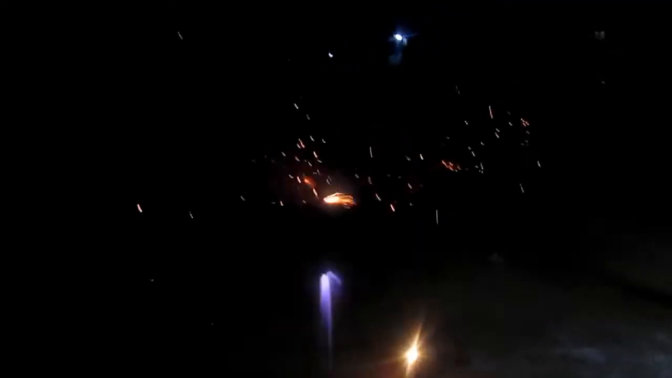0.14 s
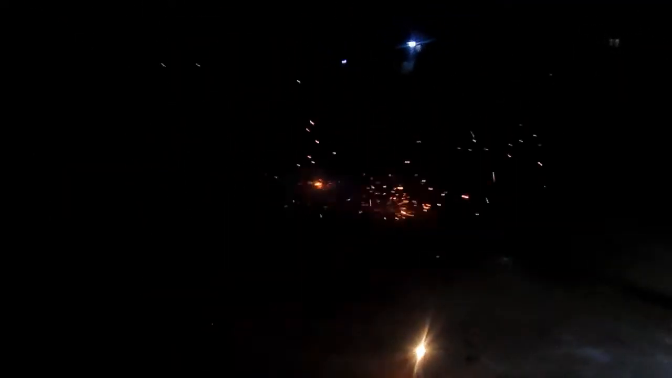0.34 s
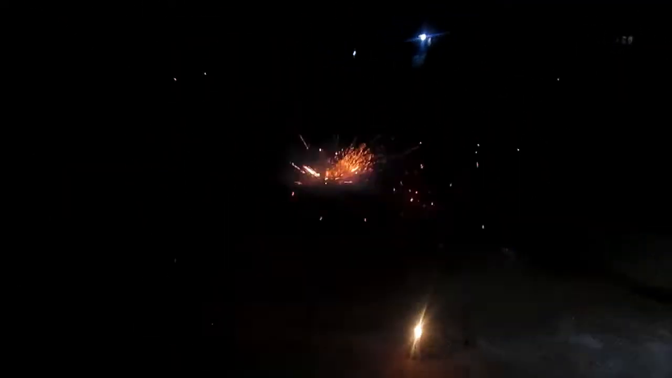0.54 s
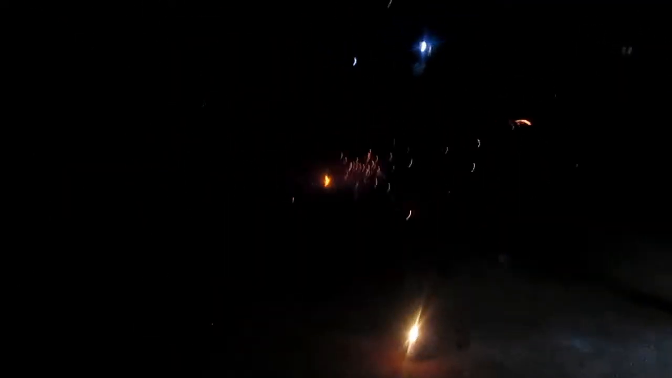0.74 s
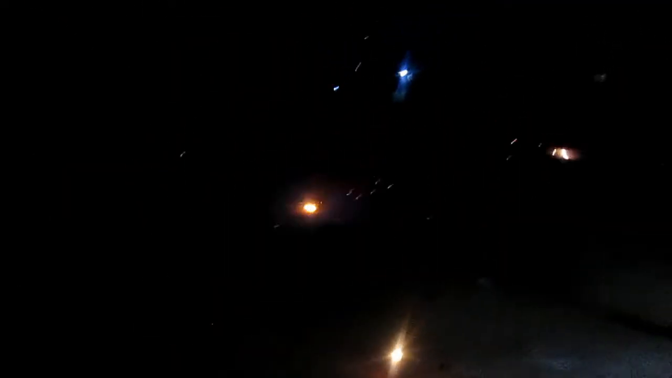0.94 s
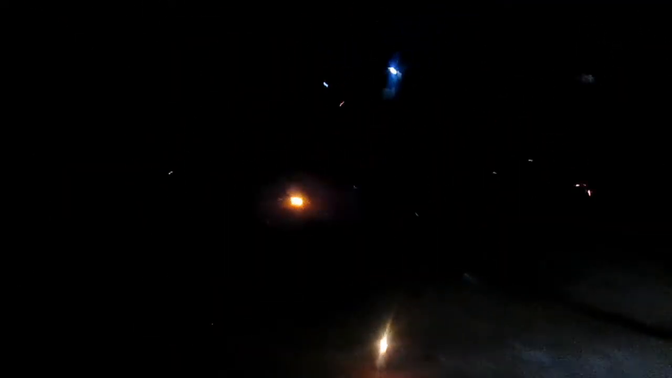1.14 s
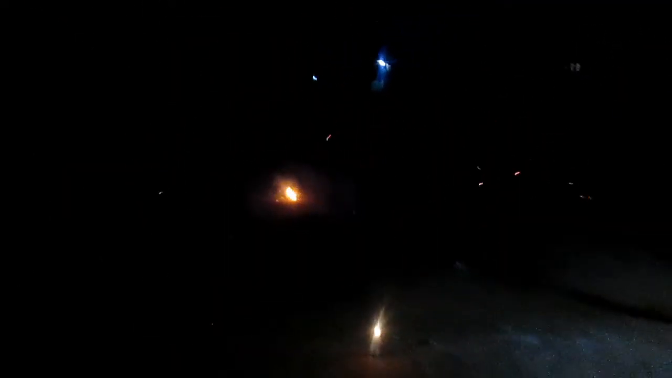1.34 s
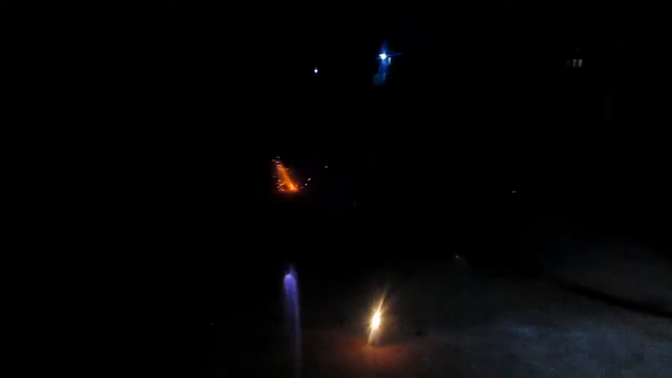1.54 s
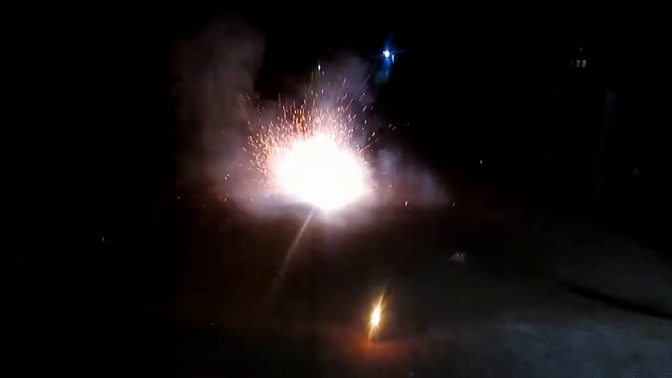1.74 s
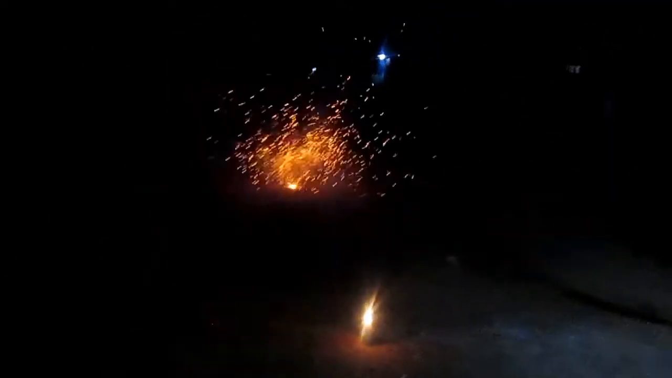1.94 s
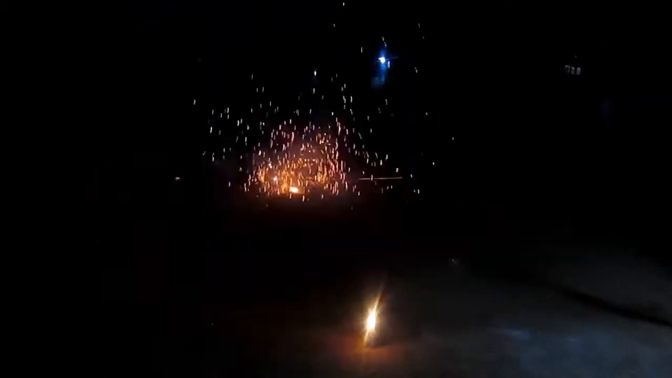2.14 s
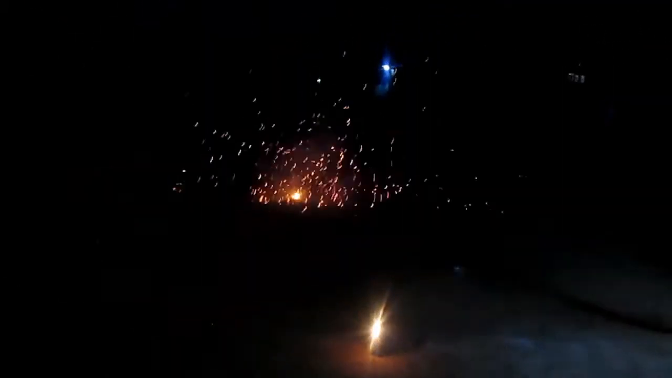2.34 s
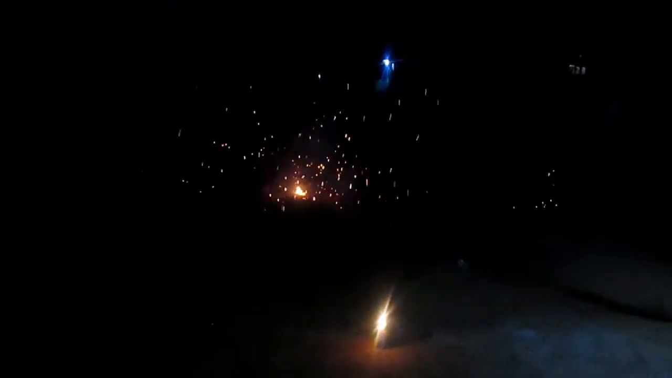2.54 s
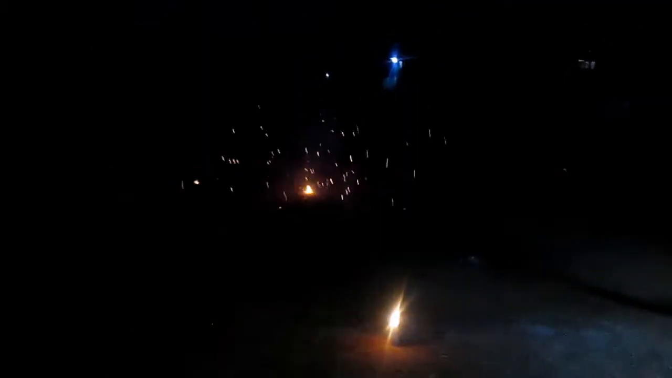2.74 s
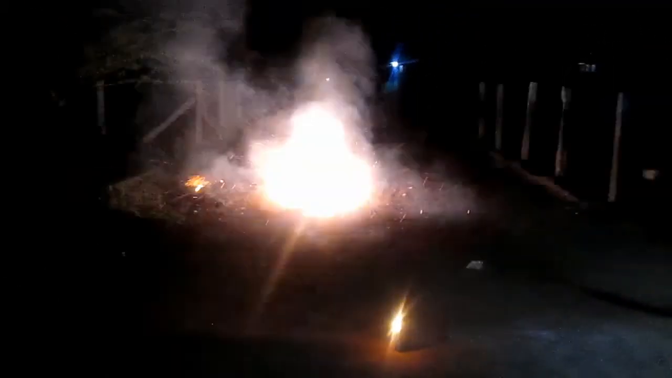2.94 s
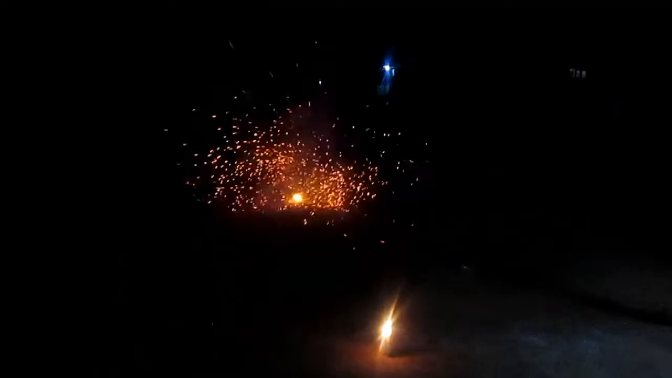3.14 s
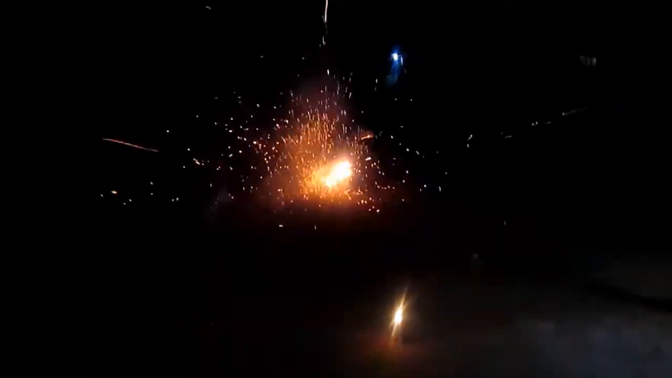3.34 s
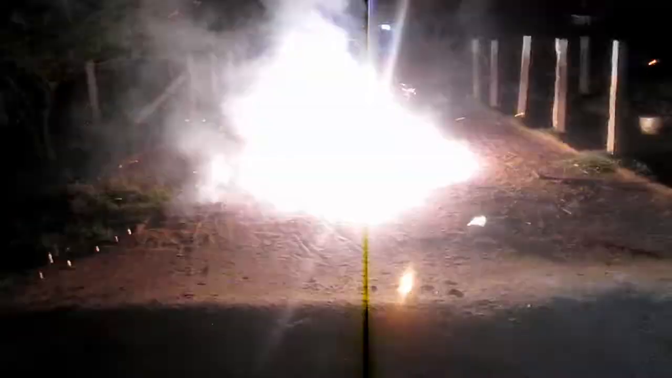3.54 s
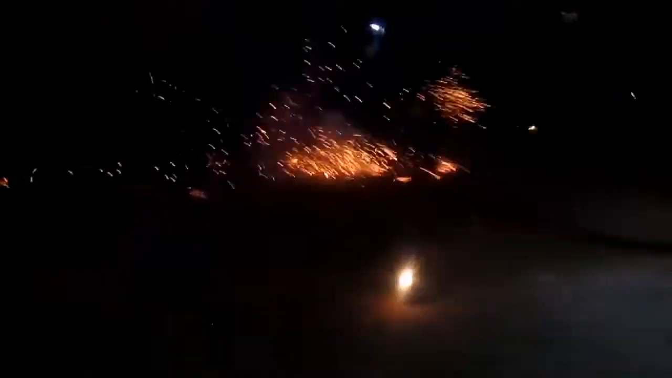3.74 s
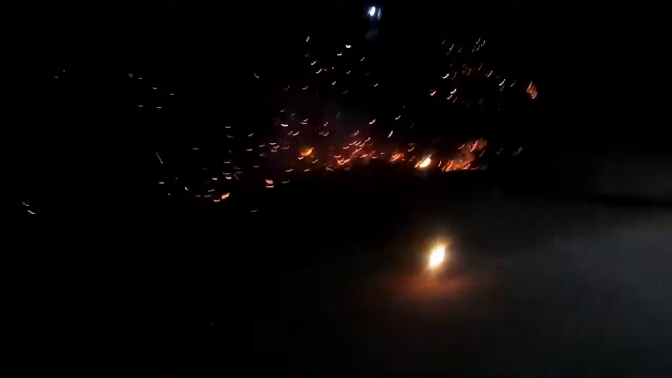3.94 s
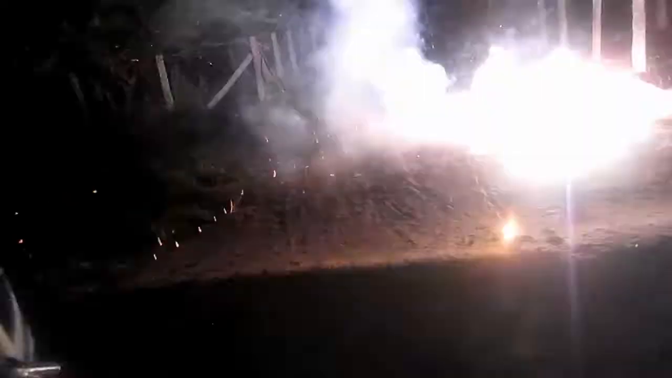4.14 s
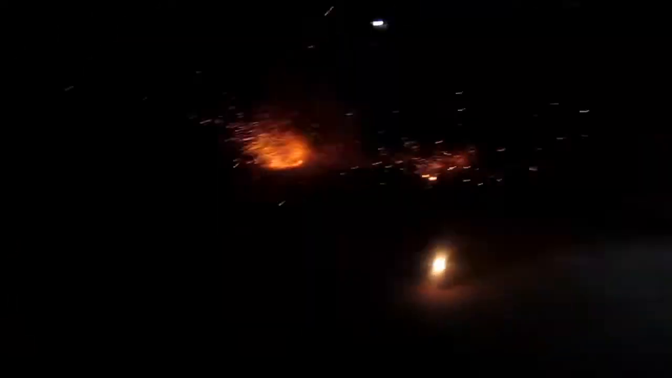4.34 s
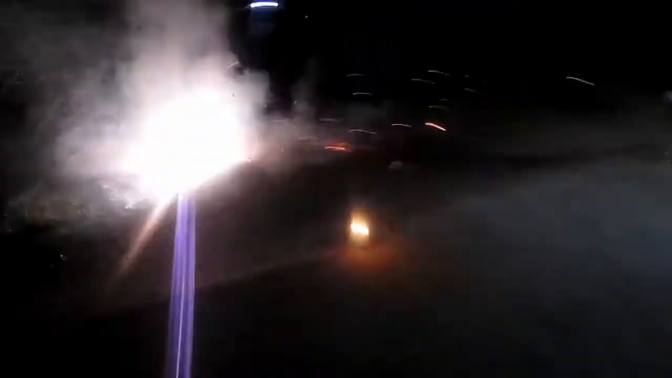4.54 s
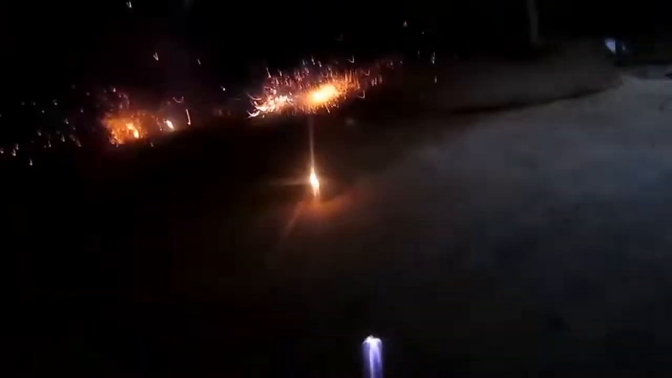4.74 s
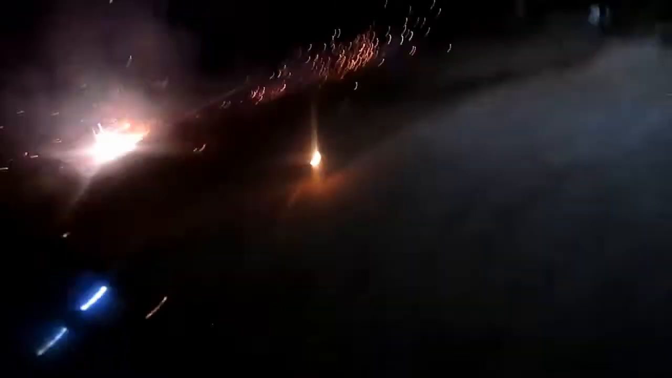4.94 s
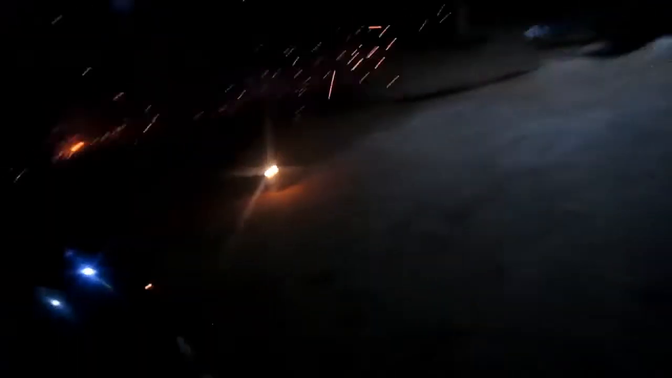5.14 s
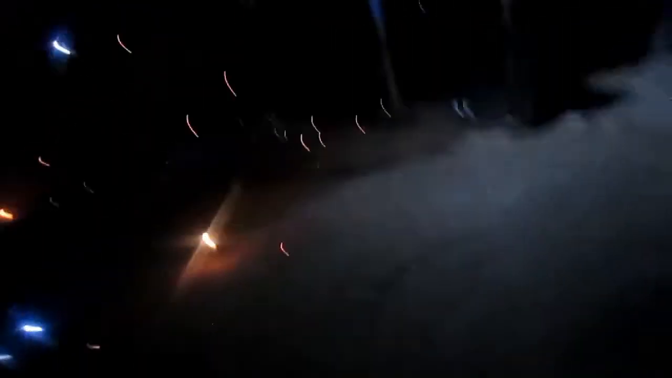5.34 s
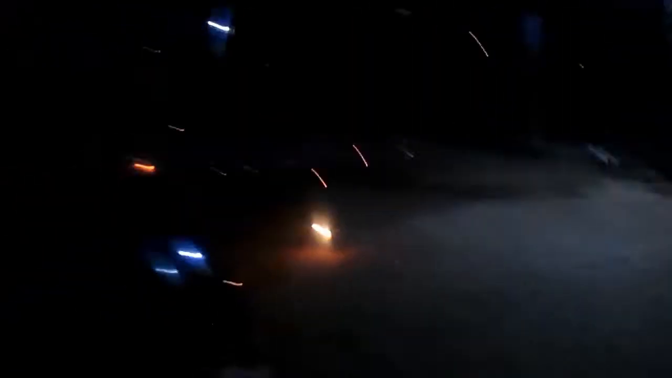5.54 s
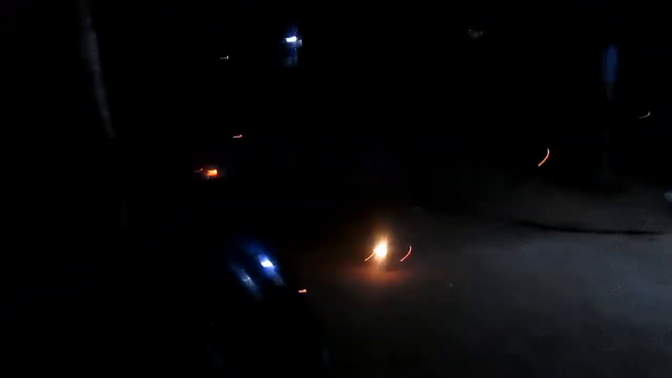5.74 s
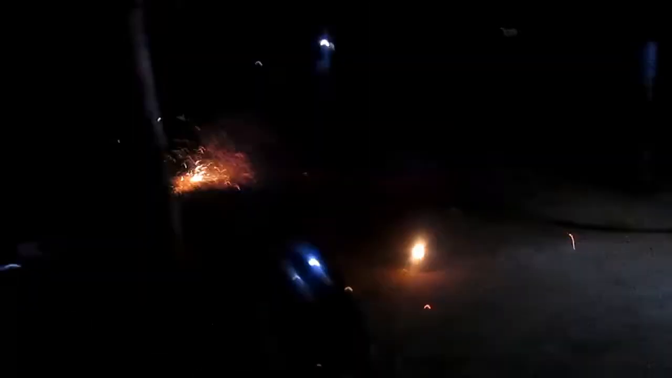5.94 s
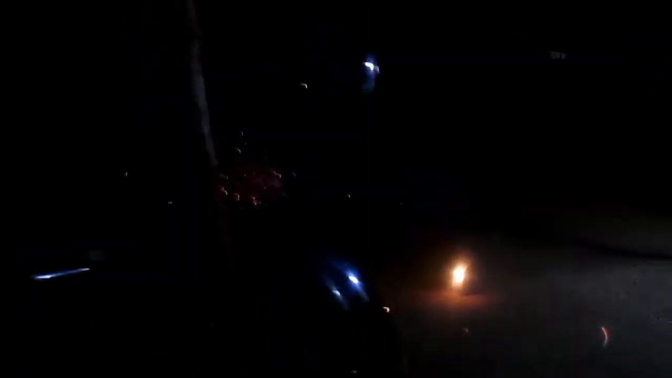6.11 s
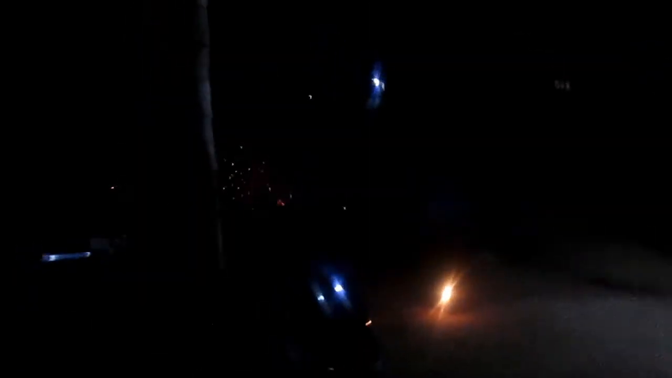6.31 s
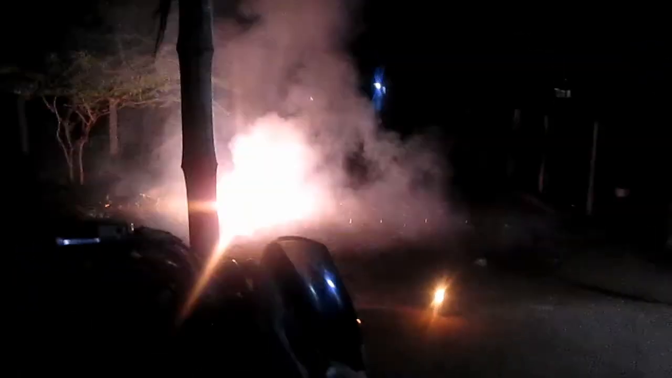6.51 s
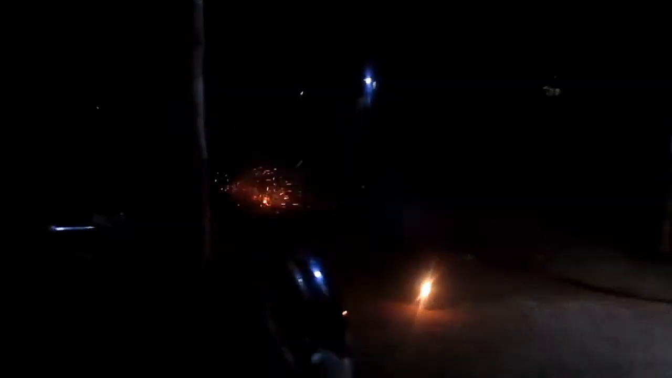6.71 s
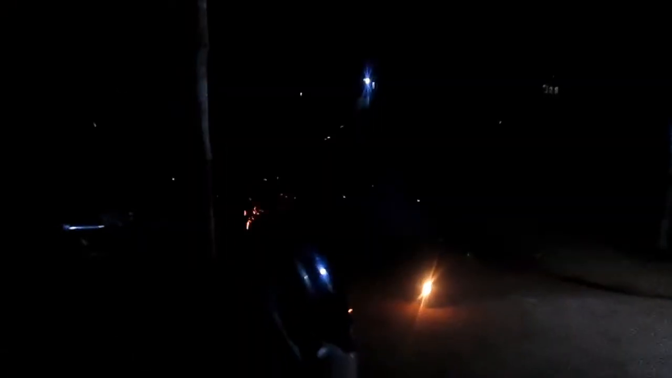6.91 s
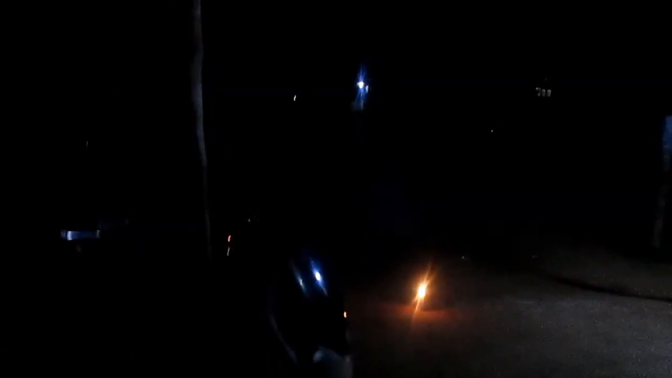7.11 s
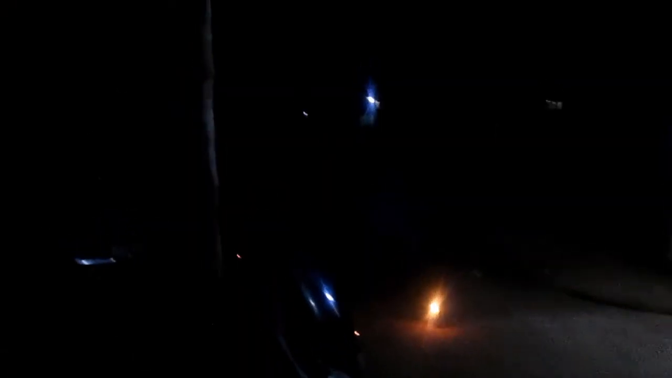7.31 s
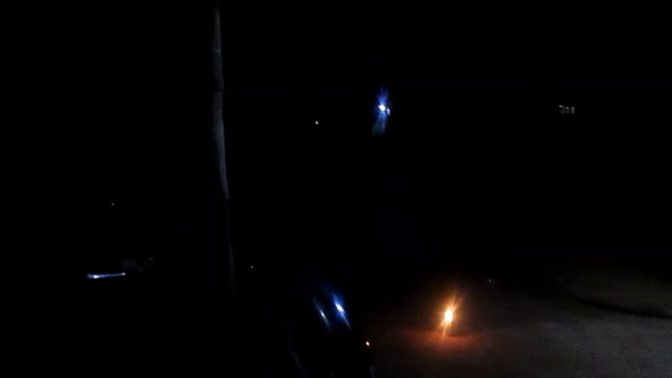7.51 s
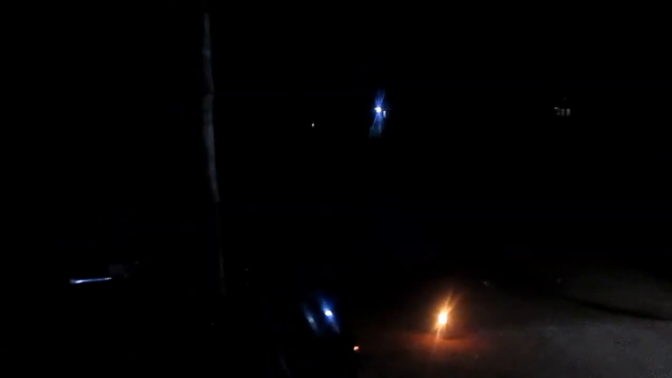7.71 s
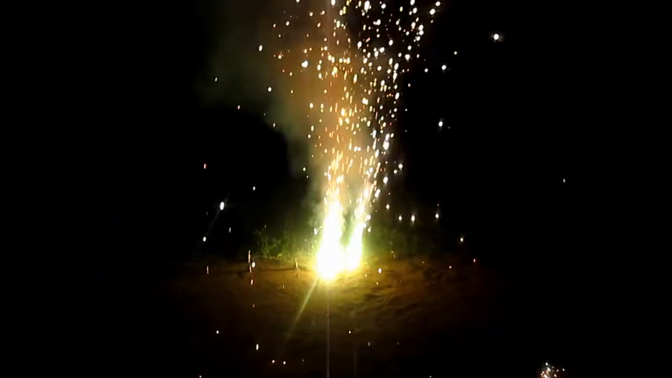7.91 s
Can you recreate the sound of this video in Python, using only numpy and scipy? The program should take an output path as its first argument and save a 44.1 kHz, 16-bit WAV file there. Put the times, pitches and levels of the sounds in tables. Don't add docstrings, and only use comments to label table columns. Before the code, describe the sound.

A string of firecrackers bangs in irregular overloaded clusters outdoors at night, with hissing sparks, snapping grit and distant crackers rolling in between.

```python
import sys
import numpy as np
from scipy import signal
from scipy.io import wavfile

SR = 44100
rng = np.random.default_rng(int(sys.argv[2]) if len(sys.argv) > 2 else 0)


def linear_from_db(decibels):
    return 10 ** (np.asarray(decibels, float) / 20)


def unload_audio(sound):
    columns = np.transpose(np.atleast_2d(sound))
    steps = np.round(np.clip(columns, -1, 1) * 32767)
    wavfile.write(sys.argv[1], SR, steps.astype(np.int16))


N = 351469

# start_s, peak_db, echo_hold_s, crack_over_thump_db
BANG_EVENTS = [(0.199, -13, 0.0047, 5), (0.519, -17.5, 0.0062, 10), (1.603, -13, 0.0017, 6),
               (1.697, -10.5, 0.028, 8), (1.977, -18.5, 0.0082, 14), (2.074, -17.5, 0.025, 7.5),
               (2.855, -12, 0.0077, 2.3), (2.997, -24.5, 0.00079, 1), (3.178, -13, .02, 6),
               (3.224, -16.5, 0.014, 4.5), (3.578, -18, 0.018, 2.5), (3.646, -17, .043, 8.5),
               (4.046, -21, 0.039, 3.5), (4.156, -13.5, 0.047, 7.5), (4.272, -8, .006, 1.5),
               (4.315, -14, 0.031, 10.5), (4.595, -21, 0.016, 4.5), (4.649, -21.5, 0.01, 4),
               (4.733, -13, 0.0045, -4.5), (4.815, -13, 0.0063, 0), (4.877, -11, 0.0058, 0.3),
               (4.955, -14.5, 0.011, -9), (5.773, -13, 0.012, 5.5), (5.899, -17, .011, 2),
               (6.555, -11.5, 0.019, 5), (6.66, -14.5, 0.011, 8.5)]


def rms_one(x):
    return x / np.sqrt(np.mean(x ** 2) + 1e-20)


def in_time(rows):
    s, *columns = np.transpose(rows)
    return [np.interp(np.arange(N) / SR, s, column) for column in columns]


def passed(x, hz, kind, order=2):
    return signal.sosfilt(signal.butter(order, hz, kind, fs=SR, output="sos"), x)


def drift(rate):
    points = np.tanh(rng.standard_normal(1600) / 1.5)
    return rms_one(np.interp(np.arange(N) * rate / SR, np.arange(1600), points))


def coloured(spectrum, patchy_db):
    hz, db = np.transpose(spectrum)
    edges = hz[0] * 2 ** np.arange(0, np.log2(hz[-1] / hz[0]), .5)
    out, together, white = 0, drift(23.0), rng.standard_normal((2, N))
    for k, (low, high) in enumerate(zip(edges, edges[1:])):
        level_db = np.interp(np.log(low * high) / 2, np.log(hz), db)
        flicker_db = patchy_db * (1.26 * together + drift(25.))
        out = out + linear_from_db(level_db + flicker_db) * passed(white[k % 2], [low, high], "band")
    return rms_one(out)


def add(track, sound, s):
    at = round(s * SR)
    track[at:at + len(sound)] += sound[:N - at]


def rolls(rows, rise_s):
    out, t = np.zeros(N), np.arange(SR) / SR
    for s, db, t60 in rows:
        dying = linear_from_db(2 * (db - 60 * t / max(t60, .05)))
        add(out, dying * np.minimum(t / rise_s, 1), s)
    return out


def crickets():
    # start_s, end_s, start_pitch_hz, end_pitch_hz, level_db, share_blurred
    chirps = [
        (1.206, 1.61, 6360, 6850, -23.5, 0.39),
        (7.124, 7.396, 6900, 6900, -33, 0.18),
        (7.518, 7.9, 6580, 6700, -32.5, 0.82),
    ]
    out = np.zeros(N)
    for start, end, from_hz, to_hz, db, blur in chirps:
        t = np.arange(round((end - start) * SR)) / SR
        stroke = (59. * t + 0.049 * drift(25.0)[:len(t)]) % 1
        hz = np.linspace(from_hz, to_hz, len(t)) - 550.0 * (stroke - .5)
        tone = np.sin(2 * np.pi * np.cumsum(hz) / SR)
        pulses = np.sin(np.pi * stroke) ** 2.0 * linear_from_db(2.2 * drift(60.)[:len(t)])
        clear = np.minimum(t / 0.35, 1) * pulses * tone
        white = rng.standard_normal(SR)[:len(t)]
        narrow = rms_one(passed(white, [.965 * to_hz, 1.015 * to_hz], "band"))
        haze = 0.5 * np.minimum(t / 0.16, 1) * narrow
        add(out, linear_from_db(db) * ((1 - blur) * clear + blur * haze), start)
    return out


def katydid():
    # start_s, length_s, loudest_pitch_hz, level_db
    scrapes = [(1.068, 0.057, 9000, -37.5), (1.15, .045, 10900, -47), (1.224, 0.056, 9300, -43),
               (1.254, 0.063, 8100, -38), (1.312, 0.052, 8300, -39.5), (1.448, 0.071, 9240, -42),
               (1.55, 0.08, 9700, -32), (5.492, 0.055, 9400, -39), (5.6, .04, 9300, -41),
               (5.634, 0.04, 8200, -41), (5.684, .05, 9700, -42), (7.477, 0.066, 9900, -40.5),
               (7.532, 0.059, 9100, -39), (7.627, .025, 9700, -51), (7.747, .03, 8600, -48)]
    wing_pitches = [7900, 8800, 9900, 11000]
    out = np.zeros(N)
    for start, length, hz, db in scrapes:
        teeth = rng.standard_normal(SR // 10)[:round(length * SR)]
        buzz = rms_one(passed(teeth, [.985 * hz, 1.015 * hz], "band"))
        buzz += 0.69 * rms_one(passed(teeth, [8000., 11500.], "band"))
        for wing_hz, chance in zip(wing_pitches, rng.standard_normal(len(wing_pitches))):
            ringing = rms_one(passed(teeth, [.99 * wing_hz, 1.01 * wing_hz], "band"))
            buzz += linear_from_db(-11 + 6.7 * chance) * ringing
        add(out, linear_from_db(db - 3) * np.hanning(len(teeth)) ** .5 * buzz, start)
    return out


def night_rumble():
    # pitch_hz, level_db (per Hz)
    hum = [(30, -13), (60, -7.5), (110, -3.5), (180, 6.5), (280, -11), (420, -13)]
    rumble_db, after_bang_db, die_away_s = -43.5, -31, 2.8
    stirred = rolls([(s, db + after_bang_db, die_away_s) for s, db, *_ in BANG_EVENTS], .05)
    return np.sqrt(linear_from_db(2 * rumble_db) + stirred) * coloured(hum, patchy_db=0.0)


def fuse_and_far_crackers():
    # start_s, vigour_db, sparkiness_db
    burning = [(0, -30, -0.5), (.4, -42, 2), (1.1, -37, -3.5), (1.6, -36, 4.5), (2.3, -32.5, 2.5),
               (2.7, -33, 1), (3.1, -36, 1.5), (3.35, -35.5, 4.5), (3.55, -32, 3.5), (4.0, -35, 4),
               (4.55, -25.5, -5), (5.07, -48, 4), (5.2, -29, -6), (5.75, -30.5, 1), (5.765, -37.5, -3.5),
               (6.2, -33.5, 0), (7.445, -35.5, 1), (7.457, -39, 0)]
    # start_s, level_db, die_away_s, fizz_over_roar_db
    far_rolls = [(0.029, -30.5, 0.28, 4), (.06, -30, 0.68, 5), (0.178, -21, 0.25, 0.5),
                 (0.432, -25.5, 1, -4.5), (.655, -32, .4, -17), (.78, -30, 1, -3), (.96, -30.5, 0.89, -2),
                 (1.02, -27, 0.23, -6), (1.58, -27.5, .2, -5), (1.9, -35, 1, -1.5),
                 (2.329, -35, 0.16, 10.5), (2.53, -25, 0.6, -5.5), (2.76, -22.5, 0.37, 4.5),
                 (3.41, -28.5, 1, -2.5), (3.77, -31.5, 0.43, -2), (3.85, -24, 0.49, -20),
                 (4.45, -29, 0.25, -25), (5.16, -26.5, 0.86, -13), (5.33, -22.5, 0.71, -23),
                 (5.42, -29.5, 0.76, 0.5), (5.7, -39, 0.36, -6), (6.12, -34.5, 0.76, 3),
                 (6.21, -31.5, 0.9, -23), (6.35, -32, 0.93, -2.5), (6.77, -31, 0.36, -3.5),
                 (6.92, -27.5, 0.43, -3), (7.0, -28.5, 1, -6), (7.14, -26.5, 0.43, -5.5),
                 (7.38, -27.5, 0.24, -14), (7.67, -34, 0.24, -3)]
    # pitch_hz, level_db (per Hz)
    roar_colour = [(250, -3.5), (450, -8), (800, -0.5), (1200, 0.5), (1800, -2.5), (2600, -10)]
    # pitch_hz, level_db (per Hz)
    fizz_colour = [(1500, -12), (2200, 17.5), (3200, 31), (5000, 3), (6200, -21), (9000, -23),
                   (14000, -43.5)]
    fizz_under_roar_db, far_rise_s = -5, 0.016

    vigour_db, sparks_db = in_time(burning)
    steady = linear_from_db(2 * vigour_db)
    roar_power = steady + rolls([row[:3] for row in far_rolls], far_rise_s)
    bright = [(s, db + fizz_db, t60) for s, db, t60, fizz_db in far_rolls]
    fizz_power = steady * linear_from_db(2 * (fizz_under_roar_db + sparks_db)) + rolls(bright, far_rise_s)

    sizes = linear_from_db(2.5 * np.minimum(rng.exponential(1, N), 4)) * rng.choice([-1, 1], N)
    grains = sizes * (rng.random(N) < 1500. / SR)
    grit = rms_one(passed(grains, [1800., 6500.], "band"))
    sizzle = rms_one(passed(rng.standard_normal(N), [4200., 5500.], "band", order=3))
    fizz = coloured(fizz_colour, patchy_db=1.1) + 0.75 * grit + 0.45 * sizzle
    roar = coloured(roar_colour, patchy_db=1.1)
    return linear_from_db(-1.5) * np.sqrt(roar_power) * roar + linear_from_db(2.0) * np.sqrt(fizz_power) * fizz


def spark_jets():
    # start_s, level_db, die_away_s
    jets = [
        (2.762, -23, 0.25),
        (3.423, -18, 0.12),
        (5.70, -42, 0.072),
        (7.589, -12, 0.014),
    ]
    out, t = np.zeros(N), np.arange(SR // 5) / SR
    for (s, db, t60), white in zip(jets, rng.standard_normal((len(jets), len(t)))):
        hiss = rms_one(passed(white, [4000., 11000.], "band"))
        add(out, linear_from_db(db - 60 * t / t60) * np.minimum(t / .004, 1) * hiss, s)
    return out


def snaps_and_knocks():
    # start_s, peak_db, pitch_hz, ground_echo_db
    air_snaps = [(0.0333, -3.5, 2900, -19), (0.0626, -7, 3570, -8), (0.469, -27, 2780, 18),
                 (0.7844, -19, 2960, 4), (0.9804, -28, 1500, -11), (2.2413, -10, 2630, 1.5),
                 (2.3368, -13.5, 2330, 1.5), (3.12, -7, 3550, 1), (3.4411, -9, 3800, -1),
                 (3.4575, -20, 2000, 6), (3.4912, -5, 3480, -2), (3.8443, -15, 1740, -6),
                 (3.9074, -10.5, 1870, 1), (3.9408, -6, 2840, 2), (5.143, -18.5, 2110, 0),
                 (5.7407, -5, 2180, 5), (6.041, -14, 2860, 2), (6.1647, -12, 2030, -9.5),
                 (6.8198, -17, 1610, -6), (6.9246, -17.5, 1590, -5)]
    # start_s, peak_db, pitch_hz
    paper_pops = [(0.1443, -15, 2430), (0.4424, -23, 900), (1.2504, -20, 1360), (1.406, -38, 1490),
                  (2.3068, -16, 2510), (3.4638, -12, 2560), (3.779, -7, 2850), (3.81, -10, 2650),
                  (3.9708, -10, 2430), (4.466, -8, 2870), (4.563, -3, 2600), (5.123, -27, 2040),
                  (5.2298, -17, 2300), (5.2835, -20, 760), (5.3468, -12, 1180), (5.3596, -14, 2760),
                  (5.4256, -8.5, 2640), (5.467, -17, 1170), (5.603, -5, 1550), (5.678, -12.5, 1480),
                  (6.011, -19, 2390), (6.3702, -15, 1300), (6.4985, -13, 1490), (7.025, -21, 1180),
                  (7.128, -17, 1220), (7.279, -15, 1400), (7.3835, -12, 1480), (7.4471, -1.5, 2800),
                  (7.5627, -24, 1360), (7.6119, -14, 2380)]
    # start_s, peak_db, pitch_hz
    grit_ticks = [(0.337, -13, 4800), (0.9215, -18, 3770), (0.966, -7.5, 4130), (1.0335, -17, 3720),
                  (1.046, -13, 4360), (1.9484, -9, 3010), (2.3777, -23, 3320), (2.4345, -16.5, 3220),
                  (2.4451, -13, 3960), (2.4731, -11, 3320), (2.5098, -11, 4260), (2.531, -8, 4350),
                  (2.5607, -19, 3180), (3.0895, -25, 3270), (3.9209, -3, 3700), (4.514, -15, 3430),
                  (5.396, -8, 3120), (5.992, -33, 3230), (6.302, -10, 4400), (6.3366, -6, 4070),
                  (6.3569, 0.5, 4530), (6.865, -16, 3400), (6.9921, -3, 4360), (7.0126, -3, 4170),
                  (7.0975, -26, 4370), (7.1167, -6, 4370), (7.7932, -22, 4400)]
    # start_s, peak_db, pitch_hz
    case_knocks = [
        (1.245, -29, 165),
        (2.787, -13, 496),
        (3.902, -27, 215),
        (5.6, -24, 167),
        (6.497, -25.5, 167),
        (7.275, -35, 183),
        (7.382, -36, 165),
        (7.768, -24.5, 340),
    ]
    ring_cycles, knock_cycles, ground_lag_s = 14.9, 9.6, .0065

    out, t = np.zeros(N), np.arange(SR // 20) / SR
    off_ground = [(s + ground_lag_s, db + echo_db, hz) for s, db, hz, echo_db in air_snaps]
    dry_clicks = air_snaps + off_ground + paper_pops + grit_ticks
    rows = [(*row[:3], ring_cycles / row[2]) for row in dry_clicks]
    rows += [(*row, knock_cycles / row[2]) for row in case_knocks]
    for (s, db, hz, t60), white in zip(rows, rng.standard_normal((len(rows), len(t)))):
        spit = rms_one(passed(white, [0.67 * hz, 1.32 * hz], "band"))
        click = np.sin(2 * np.pi * hz * t) + 0.77 * spit
        shape = np.minimum(t / 0.00045, 1) * linear_from_db(-60 * t / max(t60, .002))
        add(out, linear_from_db(db + 1.0) * click * shape, s)
    return out


def bangs():
    echo_t60_s, overload_db = 0.15, 9
    out, t = np.zeros(N), np.arange(SR // 2) / SR
    uneven = np.array([drift(90.), drift(140.)])
    for (s, db, hold_s, crack_db), white in zip(BANG_EVENTS, rng.standard_normal((len(BANG_EVENTS), 3, len(t)))):
        dying_db = -60 * np.maximum(t - hold_s, 0) / echo_t60_s
        thump = rms_one(passed(white[0], [300., 1300.], "band"))
        thump = thump * (linear_from_db(dying_db) + linear_from_db(-25.0 - 51.6 * t))

        crack = passed(white[1], [1300., 5500.], "band")
        crack = crack + 0.35 * passed(white[1], [1300., 2100.], "band")
        crack = crack + 0.31 * passed(white[1], [3100., 4000.], "band")
        crack_fade = linear_from_db(dying_db - 42.0 * t) + linear_from_db(-25.5 - 67 * t) + linear_from_db(-5.0 - 2600 * t)
        crack = rms_one(crack) * crack_fade

        boom = rms_one(passed(white[2], [40., 250.], "band", order=1)) * linear_from_db(-14.0 - 680 * t)
        lumps = linear_from_db(2.02 * np.roll(uneven, -round(s * SR), axis=1)[:, :len(t)])
        build_up = np.minimum(t / 0.0007, 1) * (1 - 0.25 * np.exp(-t / 0.0061))
        echoes = build_up * (lumps[0] * thump + lumps[1] * linear_from_db(crack_db - 2.5) * crack + boom)
        shock = 2.67 * (1 - t / 0.00054) * np.exp(-t / 0.001)
        add(out, linear_from_db(db + overload_db) * (echoes + shock), s)
    return out


def scene():
    insects = crickets() + katydid()
    burning = night_rumble() + fuse_and_far_crackers() + spark_jets()
    air = insects + burning + snaps_and_knocks() + bangs()
    return np.array([air, air])


def cupped(x):
    # start_s, share_covered
    hand = [
        (0, 0),
        (4.58, 0.21),
        (4.64, 0.29),
        (4.72, 0.68),
        (5.28, 0.78),
        (5.36, 0),
        (8, 0.03),
    ]
    # pitch_hz, width_hz, level_db
    hollows = [
        (650, 650, 0.5),
        (2126, 235, 5.5),
    ]
    ringing = sum(linear_from_db(db) * passed(x, [hz - width / 2, hz + width / 2], "band", order=1)
                  for hz, width, db in hollows)
    share = np.clip(in_time(hand)[0], 0, 1)
    return (1 - share) * x + share * (ringing + 1.04 * passed(x, 400.0, "low"))


def band_limit(x):
    return signal.sosfilt(signal.butter(12, 16470, fs=SR, output="sos"), x)


def record(dry):
    ceiling, hiss_db, end_s = .385, -68.5, 7.897
    drive = cupped(dry) / ceiling
    clipped = ceiling * drive / (1 + np.abs(drive) ** 3) ** (1 / 3)
    lopsided = clipped + .03 * np.tanh(drive ** 2)
    clipped = passed(lopsided, 36.0, "high", order=1)

    port = clipped + 0.23 * passed(clipped, [3600., 5200.], "band", order=1)
    dulled = passed(port, 3204.0, "low") - linear_from_db(-28.5) * passed(clipped, 7000., "high")

    unlike = linear_from_db(-26) * passed(np.roll(dulled[0], 150), [3500., 4800.], "band")
    unlike = unlike + linear_from_db(-14.5) * passed(np.roll(dulled[0], 90), 8300.0, "high")
    unlike = unlike + linear_from_db(-37.5) * dulled[0]

    white = rng.standard_normal((3, N))
    hiss = linear_from_db(hiss_db) * passed(white[:2] + white[2], 5400.0, "high")
    top_cut = signal.cheby2(10, 60, 16800, fs=SR, output="sos")
    both = signal.sosfilt(top_cut, dulled + unlike * [[1], [-1]] + hiss)
    running = np.clip((end_s - np.arange(N) / SR) / 0.0021, 0, 1)
    return band_limit((both - .005) * running)


dry = scene()
out = record(dry)
unload_audio(out)
```